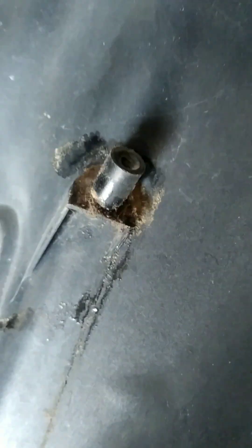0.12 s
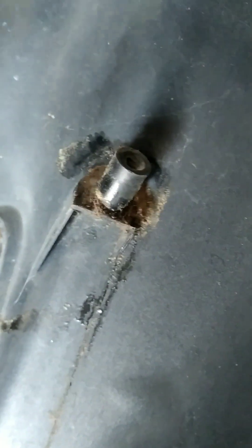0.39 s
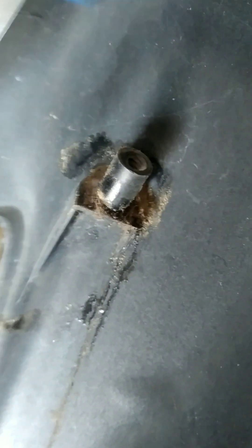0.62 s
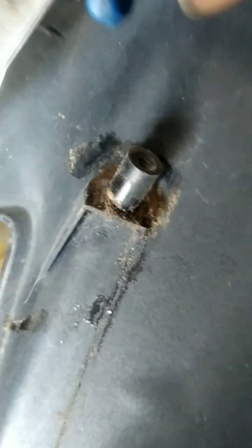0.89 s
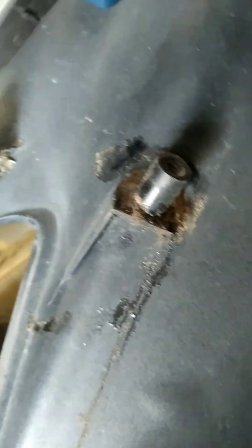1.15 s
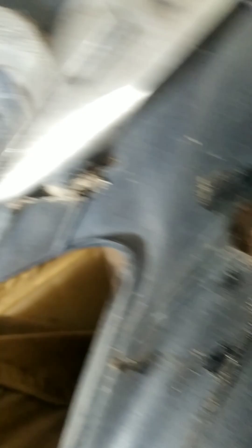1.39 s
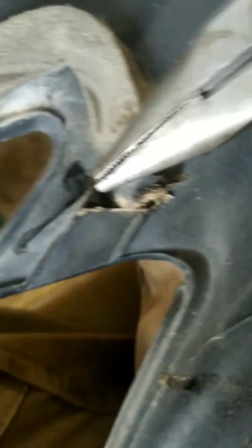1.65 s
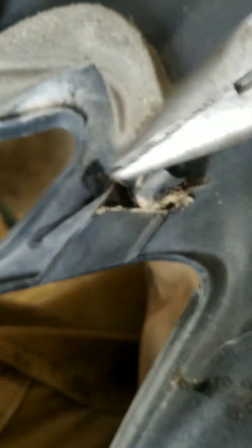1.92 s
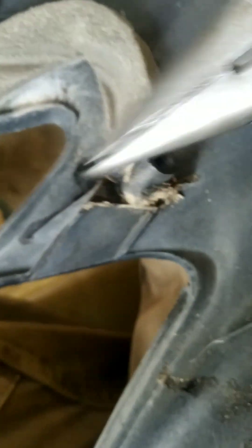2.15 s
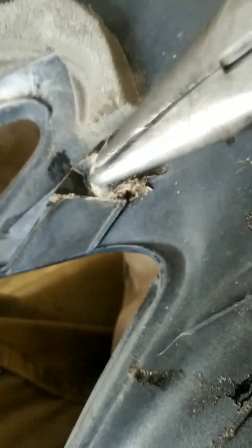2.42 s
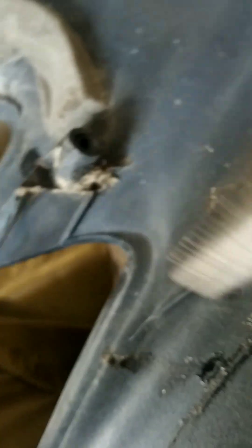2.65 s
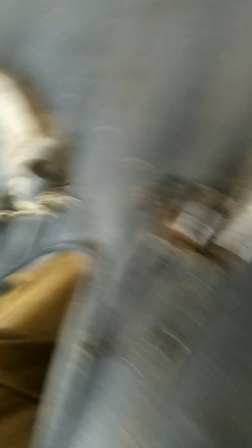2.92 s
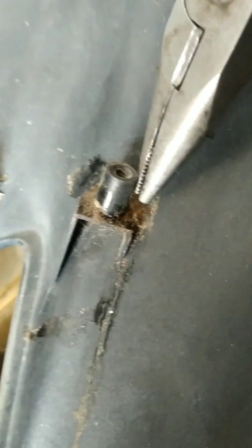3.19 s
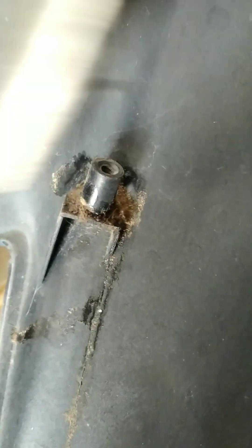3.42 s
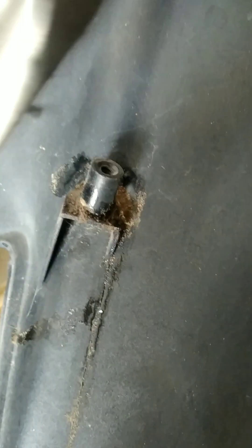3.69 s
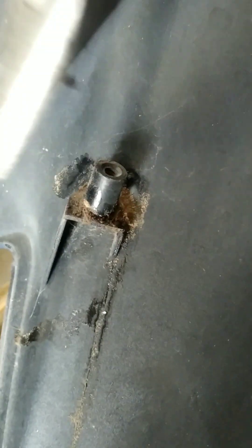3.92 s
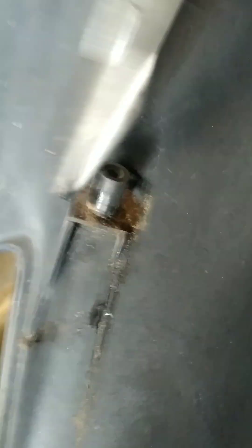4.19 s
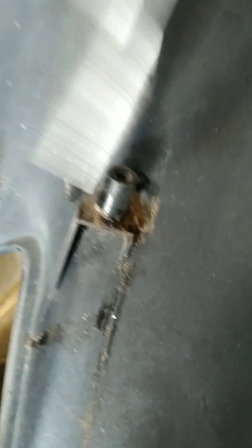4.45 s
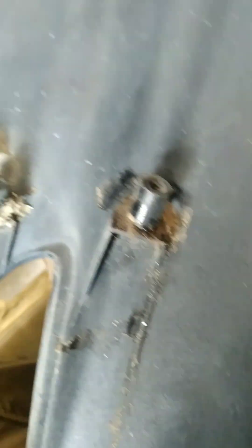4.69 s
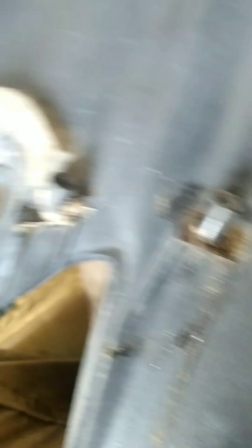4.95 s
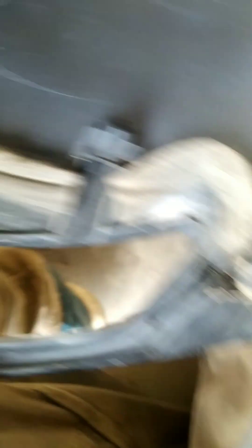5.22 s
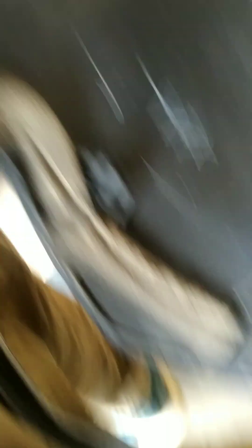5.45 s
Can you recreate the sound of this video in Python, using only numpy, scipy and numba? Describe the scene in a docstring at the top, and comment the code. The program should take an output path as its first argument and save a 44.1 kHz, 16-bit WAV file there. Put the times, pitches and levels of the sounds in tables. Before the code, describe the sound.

Dry, hollow plastic knocks with sharp snaps and short rattles come in quick runs, separated by light scraping, then a final jumbled clatter.

```python
"""A faint hum and hiss come first, then the steel tip of a pair of pliers knocks on a hard plastic panel
near a phone, in two runs and a last rattle. Each blow is a snap of noise plus decaying tones, one for each
way the panel can vibrate (a mode), with small-room echoes. Sometimes the tip drags, as grainy noise.
Faint chirps are narrow bands of noise. The phone's gain control holds the tails up and its gate then
shuts them off."""
import sys
import numpy as np
from scipy import signal
from scipy.fft import rfft, irfft, next_fast_len
from scipy.io import wavfile
from scipy.ndimage import uniform_filter1d, minimum_filter1d
from numba import njit

SR = 44100
rng = np.random.default_rng(int(sys.argv[2]) if len(sys.argv) > 2 else 0)


def wav_record(signal):
    """Record a signal, one row per channel, as 16-bit PCM in the file named by sys.argv[1]."""
    frames = np.transpose(np.atleast_2d(signal))
    bounded = np.clip(frames, -1, 1)
    # unit amplitude maps onto the largest positive 16-bit level
    quanta = np.round(bounded * 32767).astype(np.int16)
    wavfile.write(sys.argv[1], SR, quanta)


def ratio(d):
    """dB to gain"""
    e = np.asarray(d, float) / 20
    return 10 ** e


N = 246415
TIME = np.arange(N) / SR
RATTLE_S = 0.031  # time constant with which the rattle after a blow dies away
DRAG_SPOT = 0.35  # where the tip drags, on the same 0-1 scale as the blows


def along(hz, table):
    """Read a table of values against frequency, with pitch-like (logarithmic) spacing."""
    f, v = np.transpose(table)
    return np.interp(np.log(hz + 1), np.log(f + 1), v)


def colour(x, table):
    """Make some pitches of a noise louder than others; steady white noise keeps its overall level."""
    size = next_fast_len(N + SR // 10)
    hz = np.arange(size // 2 + 1) * SR / size
    gain = ratio(along(hz, table))
    gain = gain / np.sqrt(np.mean(gain ** 2))
    return irfft(rfft(x, size) * gain, size)[..., :N]


# Tone of the room air: (frequency [Hz], relative level [dB per Hz])
AIR_TONE = [(24, -89), (50, -10.5), (123, -16), (164, -31), (359, -24.5), (1000, -33.5), (1870, -33),
            (2200, -34.5), (3390, -39.5), (5330, -36), (6930, -38), (8390, -59), (12000, -57),
            (15600, -123), (22000, -120)]
# Rise and fall of air and hum, ahead of the later gains: (time [s], level [dB])
AIR_LEVEL = [(0, -67), (.15, -64.5), (.5, -50), (2.7, -58), (3.2, -50.5), (4.7, -54.5), (5.0, -52),
             (5.6, -49)]
# Steady hum tones: (frequency [Hz], level [dB against the air])
HUM_TONES = [(119, -6.5), (238, -13.5), (303, -7)]


def air_and_hum():
    """Room air is soft noise, alike at both ports only in the bass; the hum is a few low sine tones."""
    own = colour(rng.standard_normal((2, N)), AIR_TONE)
    shared = colour(rng.standard_normal(N), AIR_TONE)
    bass = signal.butter(2, 600, fs=SR, output="sos")
    air = own + signal.sosfilt(bass, shared - own)
    hum = sum(ratio(db) * np.sin(2 * np.pi * hz * TIME) for hz, db in HUM_TONES)
    return ratio(np.interp(TIME, *np.transpose(AIR_LEVEL))) * (air + hum)


# How far the left microphone port leads the right: (frequency [Hz], phase lead [radians])
PORT_LEAD = [(0, 0.17), (780, -0.75), (1980, -7), (2330, -15.5), (2760, -2.5), (3360, -10.5), (3790, -0.5),
             (4650, -5.5), (8100, -16.5), (9650, -14), (11100, -63), (11600, -18), (14100, 5.5),
             (16000, -4.5)]
# How much louder the left port is than the right: (frequency [Hz], level difference [dB])
PORT_BALANCE = [(60, 0.5), (200, -2), (380, -1.5), (700, -19.5), (1290, -16), (2380, 9.5), (4400, -22.5),
                (9000, -3.5), (15000, 1)]


def ports(x):
    """The two microphone ports hear one source, each with its own phase and level."""
    size = next_fast_len(N + SR // 10)
    hz = np.arange(size // 2 + 1) * SR / size
    lead = np.interp(hz, *np.transpose(PORT_LEAD))
    half = ratio(along(hz, PORT_BALANCE) / 2) * np.exp(.5j * lead)
    return irfft(rfft(x, size) * np.array([half, 1 / half]), size)[:, :N]


def grit(own):
    """Noise as both ports hear it; each port adds a share of its own above the bass."""
    no_bass = signal.butter(2, 450, "highpass", fs=SR, output="sos")
    apart = signal.sosfilt(no_bass, rng.standard_normal((2, N)))
    return ports(rng.standard_normal(N)) + own * apart


# Blows of the tip: (time [s], strength [dB], hardness = lift of the upper modes [dB],
# rattle against the strength [dB], spot on the panel [0-1]); strengths are ahead of the later gains
BLOWS = [(.178, -1.5, 11, 5, 0.56), (.394, 3.5, 8.5, -1.5, 0.2), (.593, -9.5, 7.5, 11.5, 0.1),
         (.797, -0.5, 13, 5, 0.5), (1.005, 3.5, 7.5, 4, 0.1), (1.198, -11, 8.5, 13.5, 0.2),
         (1.390, 4, 9, -5, 0.3), (1.589, -6.5, 9.5, -2, 0), (1.801, 2, 5.5, -3, 0), (2.026, 4, 11, -4, 0.5),
         (2.234, -3.5, 7, 3.5, 0.1), (2.423, 2, 13.5, 0, 0.4), (2.926, -17, 8.5, -6.5, 1),
         (2.973, -18.5, 0.5, 9, 0.74), (3.088, -35.5, 16.5, -18.5, 0.66), (3.23, -29.5, 13.5, -5, 0.3),
         (3.271, -18, 9.5, -2.5, 1), (3.708, 3, 13.5, 1, 0.93), (3.936, -11.5, 16, 4.5, 1),
         (4.142, -10.5, 13, -0.5, 0.73), (4.158, 16, 13, -17, 0.82), (4.350, 3, 14.5, -4.5, 1),
         (4.377, 5, 12, -16, 0.3), (4.546, 2.5, 7.5, -3.5, 0.81), (5.026, -45, 17, -16, 0.65),
         (5.036, -6, 13, -6.5, 0.8), (5.051, -5, 15.5, 7, 0.65), (5.086, -1, 24, 1, 0.9),
         (5.104, 3, 15.5, -11.5, 0.8), (5.185, -11.5, 20, -20, 1), (5.215, -17, 6, -10.5, 1),
         (5.279, -30.5, 6.5, 4, 0.7), (5.44, -50, 22.5, 5.5, 0.4)]


def bursts(size_db, tau_s, rise_s):
    """Noise that swells at every blow and dies away."""
    clicks = np.zeros(N)
    clicks[(np.array(BLOWS)[:, 0] * SR).astype(int)] = ratio(size_db)
    fall, rise = np.exp(-1 / (tau_s * SR)), np.exp(-1 / (rise_s * SR))
    swell = signal.lfilter([1 - rise], np.convolve([1, -fall], [1, -rise]), clicks)
    return swell * grit(own=1.0)


# Panel modes: (frequency [Hz], level struck at spot 0 [dB], level struck at spot 1 [dB],
# time to fall by 60 dB [s], which panel() limits)
PANEL_MODES = [(134.7, -27.5, -39.5, 0.28), (187, -25, -36, 0.24), (233, -17.5, -22.5, 0.077),
               (250, -14, -44.5, 0.21), (306, -23.5, -10.5, 0.17), (410.2, -17, 0, 0.2),
               (451, 0.5, -4.5, 0.21), (501.3, -25.5, 13, 0.054), (537.7, -21, 2.5, 0.12),
               (582, -6, -9, 0.21), (607.2, 0.5, -5.5, .15), (667.5, 0, -14.5, 0.18),
               (734, -13, -10.5, 0.1), (749, -6, -4, 0.3), (853.6, -4, -15, 0.11), (949.2, -16, 3, 0.13),
               (1057, -19, 0, 0.04), (1249, -9.5, -2.5, 0.028), (1384, -22, -15.5, 0.15),
               (1433, -19, -18, 0.12), (1604, -17, -6, 0.023), (1848, 1, -9, 0.022), (1975, -6.5, -8, .07),
               (1925, -4.5, -6, 0.015), (2137, -6.5, 0, 0.031), (2320, -2.5, -27.5, 0.029),
               (2390, -6, -22, 0.12), (2840, -39, -16, 0.013), (2980, -20, -23.5, 0.02)]


def panel(rub):
    """Every blow or rub sets each mode ringing; the place it lands decides which modes speak."""
    panel_db, chatter_db, rattle_db, rub_db = -24.5, -16, -27, -12
    shift_rad, scatter_db, flex = 0.35, 2, 0.007  # chance spread of port phase, level and tuning (share)
    longest_t60_s, contact_s = 0.105, 0.000082
    s, db, hard_db, loose_db, spot = np.transpose(BLOWS)
    at = (s * SR).astype(int)
    last_blow = np.searchsorted(at, np.arange(N), side="right") - 1
    chance = rng.standard_normal((len(s), len(PANEL_MODES), 4))
    # the tip chatters for a few ms, and the loosely held panel rattles on
    extra = ratio(chatter_db) * bursts(db, tau_s=0.0067, rise_s=0.0018)
    extra += ratio(rattle_db) * bursts(db + loose_db, RATTLE_S, rise_s=0.0029)
    out = np.zeros((2, N))
    for k, (hz, db0, db1, t60) in enumerate(PANEL_MODES):
        # hardness lifts modes above 1000 Hz, fully from 1600 Hz up
        lift_db = np.clip((hz - 1000) / 600, 0, 1) * hard_db
        mode_db = db0 + np.clip(spot, 0, 1) * (db1 - db0) + lift_db + scatter_db * chance[:, k, 0]
        lead = np.interp(hz, *np.transpose(PORT_LEAD)) + shift_rad * chance[:, k, 1]
        half = ratio(along(hz, PORT_BALANCE) / 2) * np.exp(.5j * lead)
        force = extra + 0j
        force[:, at] += ratio(db) * np.exp(.8j * chance[:, k, 2]) * [half, 1 / half]
        drag_gain = ratio(rub_db + db0 + DRAG_SPOT * (db1 - db0))
        force = force * ratio(mode_db)[last_blow] + drag_gain * rub
        # plastic damps its upper modes fastest
        t60 = min(t60, longest_t60_s * min(1, 600 / hz) ** 0.7)
        # the grip bends the panel, so each blow finds the mode slightly retuned
        tuning = 1 + flex * chance[last_blow, k, 3]
        turn = np.exp(2j * np.pi * hz / SR * np.cumsum(tuning))
        ring = signal.lfilter([1], [1, -ratio(-60 / (t60 * SR))], force / turn)
        out += (turn * ring).imag
    # a contact of finite length cannot push the treble
    soft = np.exp(-1 / (contact_s * SR))
    out = signal.lfilter([1 - soft, 0], [1, -soft], out)
    no_treble = signal.butter(4, 3500, fs=SR, output="sos")
    return ratio(panel_db) * signal.sosfilt(no_treble, out)


# Tone of the panel's countless high modes: (frequency [Hz], relative level [dB per Hz])
CRACK_TONE = [(1650, -9.5), (2800, 1), (2990, -4.5), (3540, -13.5), (4530, -11), (7020, -17), (7720, -15.5),
              (9130, -27.5), (14700, -36.5), (16000, -49.5)]


def crack():
    """Steel on plastic snaps briefly, louder for a harder blow, and rattles on in the high modes."""
    _, blow_db, hard_db, loose_db, _ = np.transpose(BLOWS)
    db = blow_db - 32.5 + 1.41 * hard_db  # 1.41 dB of snap per dB of hardness
    snap = bursts(db, tau_s=0.0055, rise_s=0.00088)
    rattle = bursts(db + loose_db - 13.5, RATTLE_S, rise_s=0.0018)
    return colour(snap + rattle, CRACK_TONE)


def room(x):
    """A small room adds dense echoes, partly different at each port, the treble dying first."""
    low_t60, high_t60, wet_db = 0.13, 0.11, -14  # seconds to fall by 60 dB, twice; level of the echoes
    t = np.arange(SR // 2) / SR
    noise = rng.standard_normal(len(t)) + 0.9 * rng.standard_normal((2, len(t)))
    low = signal.lfilter([0.2], [1, -0.8], noise)
    echo = low * ratio(-60 * t / low_t60) + (noise - low) * ratio(-60 * t / high_t60)
    echo *= 1 - np.exp(-t / 0.01)  # the echoes build up over about 10 ms
    echo *= ratio(wet_db) / np.sqrt(np.sum(echo ** 2) / 2)
    return x + signal.fftconvolve(x, echo, axes=1)[:, :N]


# Drags of the tip: (time of the loudest moment [s], rise [s], fall [s], force [dB],
# sizzle against the force [dB]); forces are ahead of the later gains
DRAGS = [(0.785, 0.031, 0.042, -41, -13), (1.121, 0.14, 0.15, -38, -9), (1.953, 0.095, 0.13, -58, 14.5),
         (2.015, 0.017, 0.011, -37.5, -23.5), (3.064, 0.09, 0.018, -22.5, -23.5),
         (3.472, 0.061, 0.019, -29, -9.5), (3.664, 0.099, 0.19, -38.5, -28.5),
         (5.069, 0.024, 0.031, -17.5, -7.5), (5.15, 0.12, 0.13, -21.5, -21.5),
         (5.531, 0.11, 0.12, -54.5, -2.5)]
# Tone of the scraping tip: (frequency [Hz], relative level [dB per Hz])
SCRAPE_TONE = [(88, -51.5), (150, -3.5), (300, -4.5), (494, -11.5), (1120, 2.5), (2180, 1), (3620, -22),
               (7770, -12), (15100, -44), (16000, -65.5)]


def drags():
    """Rough, grainy rubbing gives a force that rings the panel, and scrape and sizzle heard directly."""
    scrape_db = -6  # against the force
    level = np.zeros((3, 1, N))
    for s, rise, fall, db, sizzle_db in DRAGS:
        shape = np.clip(1 - np.abs(TIME - s) / np.where(TIME < s, rise, fall), 0, 1) ** 2
        level += ratio(db + np.array([0, scrape_db, sizzle_db]))[:, None, None] * shape
    # the tip catches and slips about every millisecond
    catches_db = 3.0 * np.repeat(rng.standard_normal(N // 40 + 1), 40)[:N]
    rub, scrape, sizzle = level * ratio(catches_db) * grit(own=0.84)
    return rub, colour(scrape, SCRAPE_TONE) + colour(sizzle, CRACK_TONE)


# Far chirps, ahead of the later gains: (time [s], frequency [Hz], level [dB])
CHIRPS = [(2.827, 5230, -42), (3.15, 5500, -62), (3.88, 5790, -46.5), (5.422, 5660, -36)]


def chirps():
    """Each faint high chirp is a narrow band of noise that swells and fades smoothly."""
    length_s = 0.11
    out = np.zeros((2, N))
    for s, hz, db in CHIRPS:
        band = signal.butter(2, [hz - 300, hz + 300], "bandpass", fs=SR, output="sos")
        swell = np.exp(-(2 * (TIME - s) / length_s) ** 2)
        out += ratio(db) * swell * signal.sosfilt(band, rng.standard_normal((2, N)))
    return out


def scene():
    """Blows and drags sound in the room, over a background that is louder on the right."""
    rub, drag_noise = drags()
    background = (air_and_hum() + chirps()) * ratio(np.array([[-2.2], [2.2]]))
    return room(panel(rub) + crack() + drag_noise) + background


@njit
def follow(x, rise, fall):
    """Trace a level, rising and falling at its own two speeds."""
    y, e = np.empty(len(x)), x[0]
    for i in range(len(x)):
        e += (x[i] - e) * (rise if x[i] > e else fall)
        y[i] = e
    return y


def band_limit(x):
    """A steep low-pass at the top of the band."""
    return signal.sosfilt(signal.butter(12, 16470, fs=SR, output="sos"), x)


def record(dry):
    """The phone cuts bass, squeezes loud sound, gates quiet sound and limits the attacks."""
    knee_db, makeup_db = -36, 9.5
    squeeze, gate_slope, gate_db = 0.7, 1.2, 16.0  # dB per dB above and below the knee; deepest gate [dB]
    bass_cut = signal.butter(4, 135, "highpass", fs=SR, output="sos")
    dry = signal.sosfilt(bass_cut, dry)
    power = uniform_filter1d(np.mean(dry ** 2, axis=0), SR // 200)
    level_db = 10 * np.log10(power + 1e-12) - knee_db
    over_db = follow(np.clip(level_db, 0, None), 1 / (0.012 * SR), 1 / (0.012 * SR))
    under_db = follow(np.clip(-gate_slope * level_db, 0, gate_db), 1 / (0.006 * SR), 1 / (0.002 * SR))
    # the gate opens a little ahead of what is coming
    ahead = int(0.0084 * SR)
    under_db = np.minimum(under_db, np.append(under_db[ahead:], np.full(ahead, gate_db)))
    x = dry * ratio(makeup_db - squeeze * over_db - under_db)
    # the limiter looks 2 ms ahead
    peak = -minimum_filter1d(-np.abs(x).max(axis=0), SR // 250)
    excess_db = np.clip(20 * np.log10(peak / 0.98 + 1e-9), 0, None)
    excess_db = follow(excess_db, 1 / (0.0018 * SR), 1 / (0.0011 * SR))
    # whatever still sticks out is rounded off softly
    top = 0.8
    mix = top * np.tanh(x * ratio(-excess_db) / top)
    return band_limit(mix)


dry = scene()
out = record(dry)
wav_record(out)
```